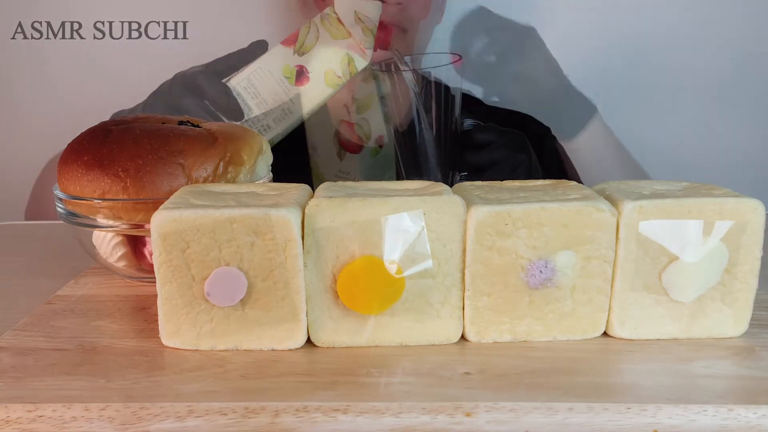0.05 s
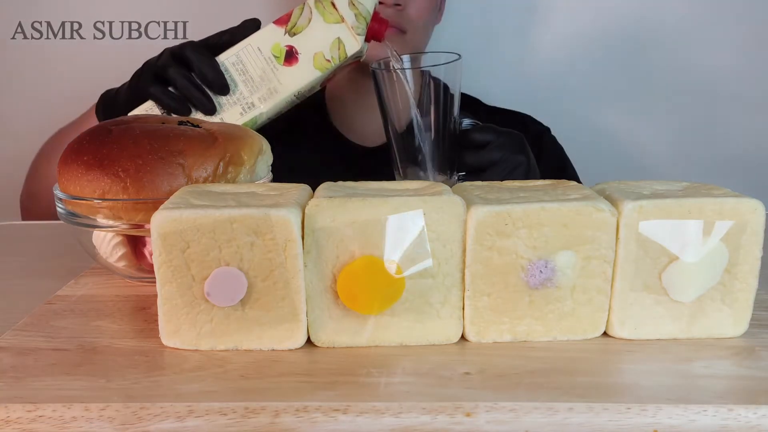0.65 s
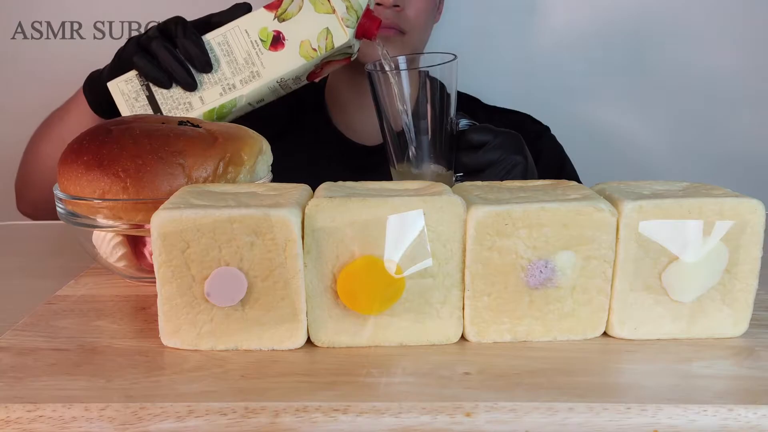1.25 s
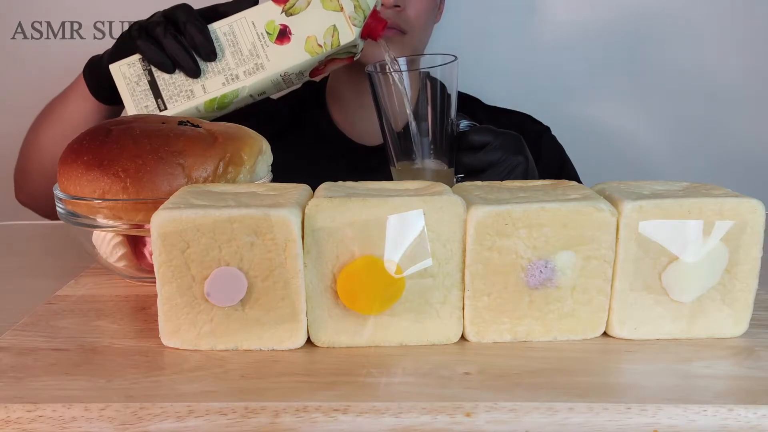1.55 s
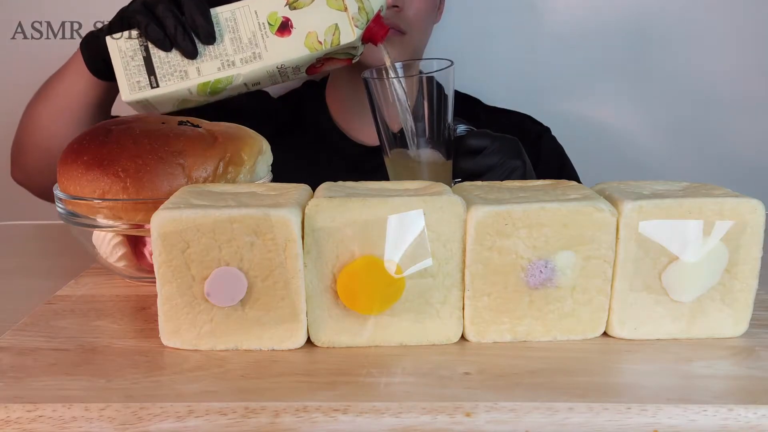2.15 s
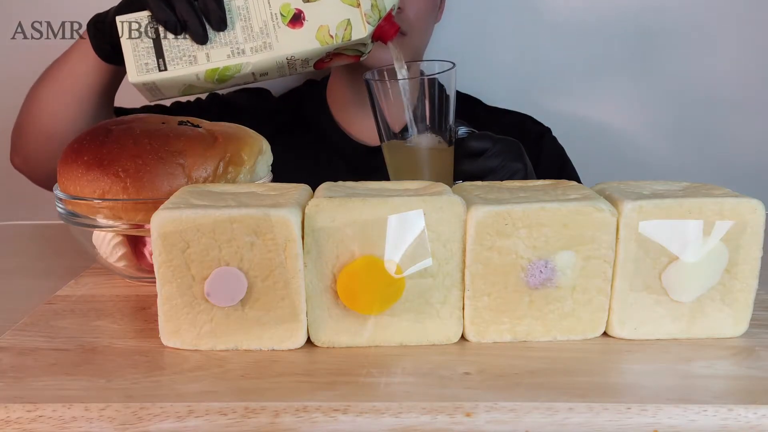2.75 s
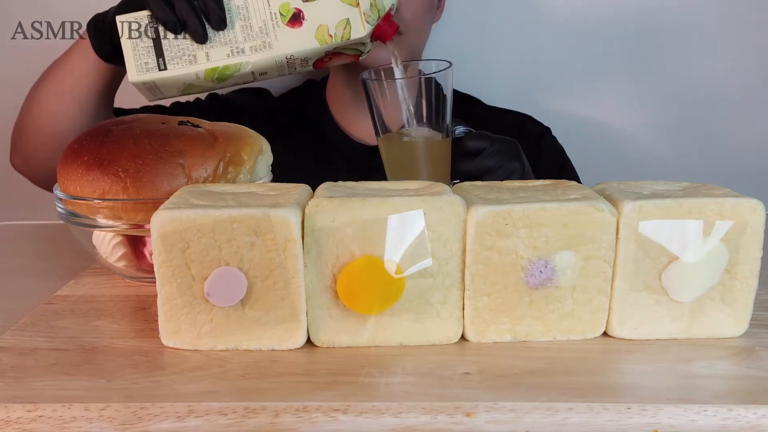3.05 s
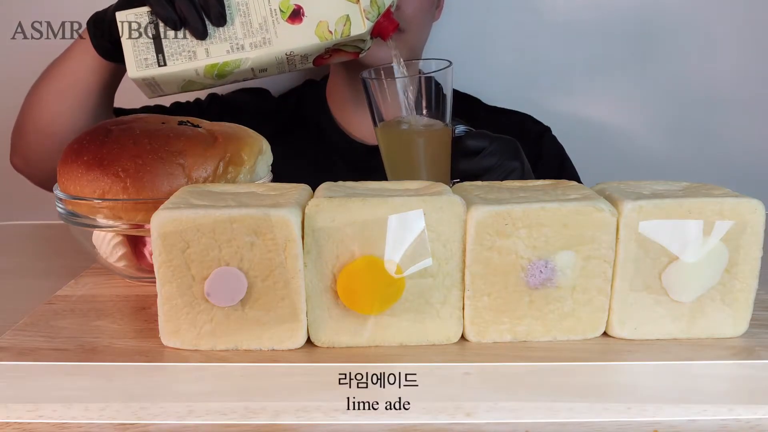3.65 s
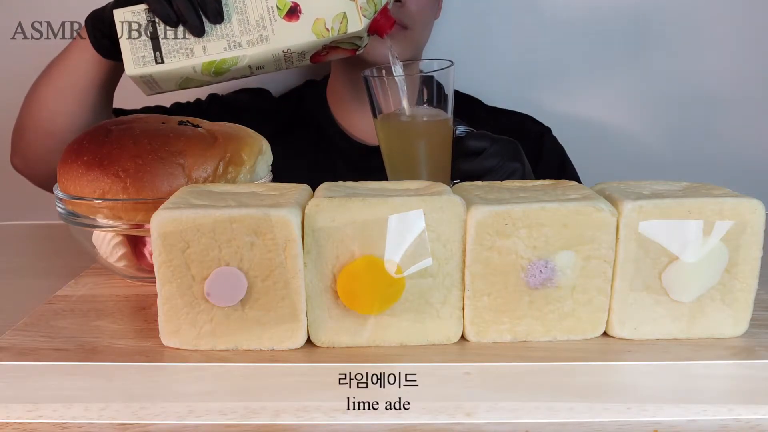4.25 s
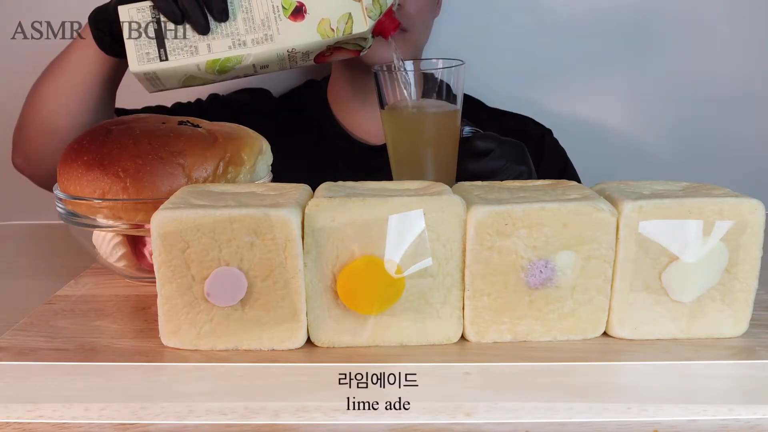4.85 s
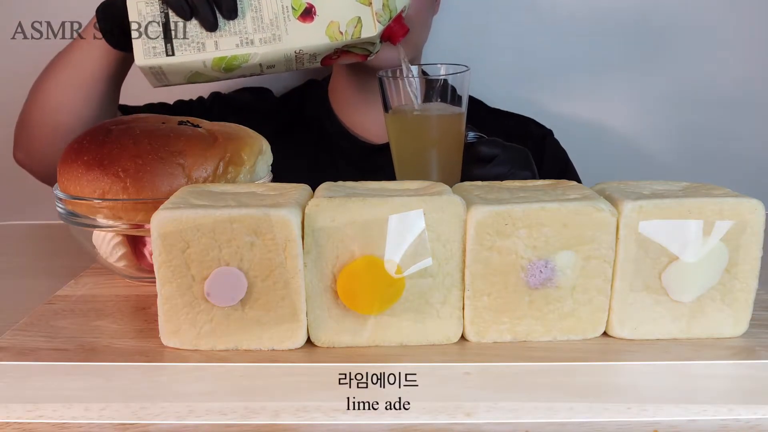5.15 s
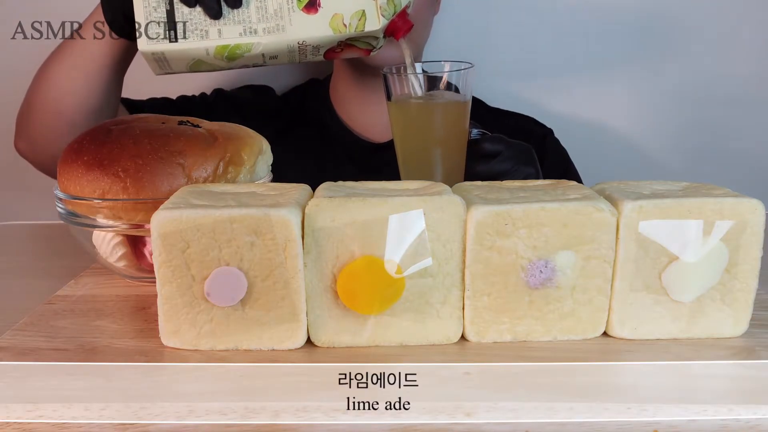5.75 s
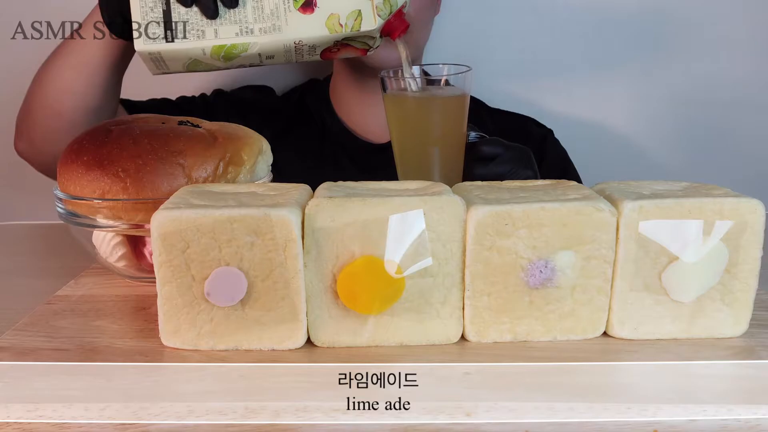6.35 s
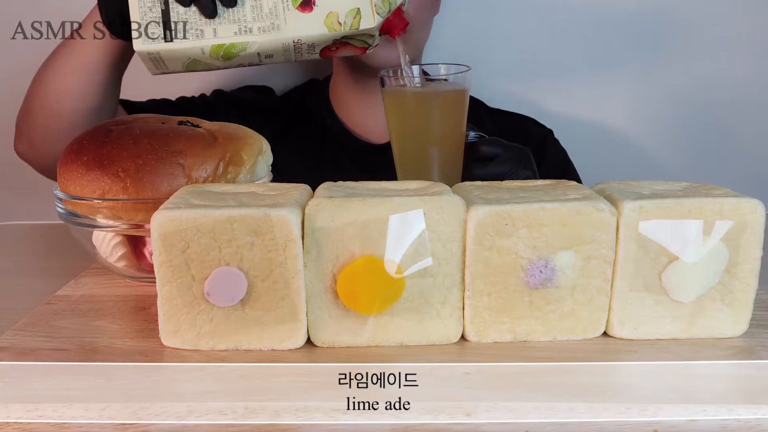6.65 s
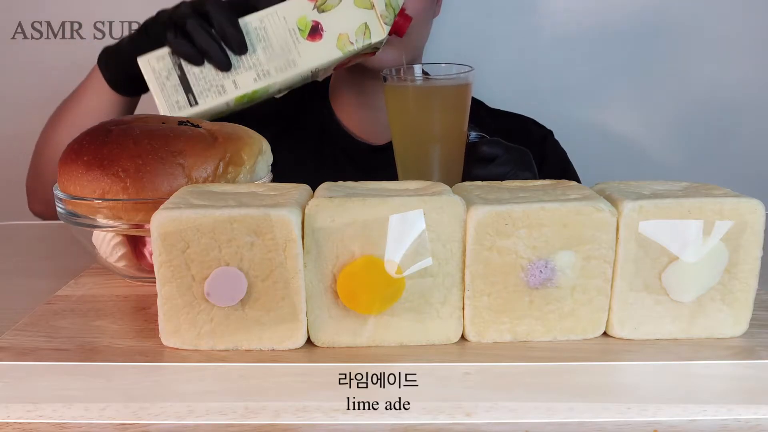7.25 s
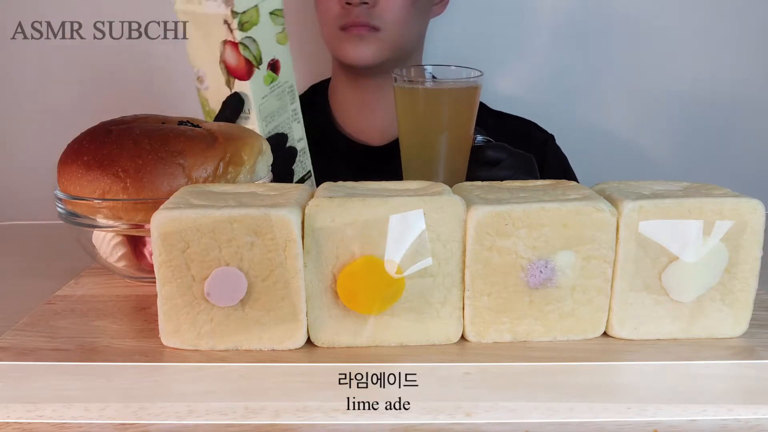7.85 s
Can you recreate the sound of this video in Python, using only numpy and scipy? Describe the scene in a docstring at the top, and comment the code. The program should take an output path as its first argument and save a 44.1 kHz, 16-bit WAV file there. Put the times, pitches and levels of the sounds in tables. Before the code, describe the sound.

A drink pours from a carton into a glass close by, with bright bubbly plinks, glugs and light fizz, thinning to drips.

```python
"""Glugs and bright plinks come first, close by and in stereo: a drink pours from a carton into a glass.
Each gush traps air, which rings as bubbles: large ones singly, over a swarm of small ones and spray.
The air column in the glass shortens as it fills, so its note rises; foam hisses and the carton gulps.
The stream thins to drips over a low rumble, and a limiter holds down the loudest plops."""
import sys
import numpy as np
from scipy import signal
from scipy.fft import rfft, irfft, next_fast_len
from scipy.io import wavfile
from scipy.ndimage import uniform_filter1d, minimum_filter1d, map_coordinates

SR = 44100
rng = np.random.default_rng(int(sys.argv[2]) if len(sys.argv) > 2 else 0)


def dump(signal):
    """Clip the signal to [-1, 1] and save it as 16-bit WAV at the path in sys.argv[1]."""
    limited = np.clip(np.atleast_2d(signal).T, -1, 1)
    pcm = np.round(limited * 32767).astype(np.int16)
    wavfile.write(sys.argv[1], SR, pcm)


N = 357210

# Levels are relative: each source applies its own gain.
# spectra of the background and of the stream: (frequency [Hz], level [dB])
RUMBLE_SPECTRUM = [(15, -58.5), (25, -17.5), (37, -29.5), (54, -7.5), (75, 2), (97, -4.5), (171, -6.5),
                   (406, -17.5), (584, -20.5), (700, -19.5), (910, -28.5), (1540, -120)]
HISS_SPECTRUM = [(180, -23), (300, -3), (418, -9), (486, -5.5), (667, -13), (713, -9), (946, -7.5),
                 (14500, -22.5), (16000, -56.5)]
GURGLE_SPECTRUM = [(200, 6.5), (600, -16.5), (780, 7), (1000, 7), (1600, 10), (2100, -4.5), (3500, -28.5)]
FIZZ_SPECTRUM = [(700, -16.5), (1400, -11), (2100, -1.5), (3400, -4.5), (5000, -6.5), (6800, -7),
                 (8500, -11.5), (14000, -50.5)]
SPRAY_SPECTRUM = [(2000, -10.5), (5000, -2), (7500, -9), (9500, -3), (11300, -0.5), (13500, 0),
                  (16000, -6.5)]
# spectra of carton bumps, foam and splashes: (frequency [Hz], level [dB])
BUMP_SPECTRUM = [(200, -15), (900, 10.5), (1600, -14.5), (3200, -4), (7000, -7), (15000, -26)]
TICK_SPECTRUM = [(2000, -3.5), (8000, -8), (11500, -7), (16000, 0.5)]
FOAM_SPECTRUM = [(800, -19.5), (2500, -9), (5000, -4), (8000, -5.5), (11500, -3), (16000, -10.5)]
SPLASH_SPECTRUM = [(200, -24), (900, -1), (2500, 7), (4500, -2.5), (6500, -11), (9000, -6), (15000, -16)]
# likeness of left and right: (frequency [Hz], correlation [1])
RUMBLE_COHERENCE = [(40, 0.09), (150, 0.14), (400, 0.3)]
HISS_COHERENCE = [(300, 0.12), (3000, 0.05)]
FOAM_COHERENCE = [(2000, 0.53), (12000, 0.41)]
# swells of rumble, probably the moving arm: (centre [s], half-width [s], level [dB])
RUMBLE_SWELLS = [(.28, 0.28, -37.5), (2.58, .05, -34), (2.75, 0.047, -40.5), (3.02, 0.037, -33),
                 (3.499, 0.93, -49), (3.95, 0.047, -41), (4.41, 0.032, -39.5), (5.013, 0.62, -36.5),
                 (5.39, 0.034, -29), (5.63, 0.058, -35.5), (6.14, 0.033, -40), (6.27, 0.092, -35.5),
                 (7.18, 0.13, -34), (7.52, 0.033, -31.5), (7.8, 0.94, -44.5)]
# reverberation time: (frequency [Hz], t60 [s])
ROOM_DECAY = [(300, 0.44), (1200, 0.42), (4000, 0.3), (12000, 0.2)]
# stereo balance of the drink: (frequency [Hz], right over left [dB])
BALANCE = [(60, 1.5), (500, 7.5), (1200, 4), (4000, 2.5), (8000, 1.5), (14000, 1.6)]
# the carton's hollow note: (time [s], frequency [Hz])
CARTON_NOTE = [(2.2, 613), (2.6, 448), (2.9, 406), (4.1, 467)]
# air entering the carton: (time [s], level [dB])
CARTON_GULPS = [(2.194, -38.5), (2.316, -31), (2.438, -25.5), (2.608, -24), (2.812, -29), (2.9, -42),
                (3.87, -45)]
# the carton set upright: (time [s], level [dB], frequency for stereo spread [Hz])
CARTON_BUMPS = [(7.52, -6, 657), (7.682, -16, 791)]
# the head of foam: (time [s], level [dB])
FOAM_LEVEL = [(0, -85), (2.5, -69), (4.1, -57.5), (4.4, -46.5), (4.9, -44), (5.5, -44), (5.9, -55.5),
              (7.3, -48.5), (7.7, -51.5), (8.1, -54)]
# hum of the glass wall: (time [s], level [dB])
WALL_LEVEL = [(4.1, -84), (4.4, -53), (4.6, -61), (4.75, -58), (5.25, -39), (5.5, -50), (5.85, -63),
              (6.95, -64), (7.13, -46), (7.35, -52.5), (7.6, -49.5), (7.8, -72)]
# low and high modes of the glass: (frequency [Hz], width [Hz], level [dB])
HUM_MODES = [(1520, 100, -2.5), (2656, 180, -9.5)]
SHIMMER_MODES = [(6775, 330, -6), (10980, 720, 0.5)]
# the air above the drink: (time [s], first resonance [Hz], second resonance [Hz])
AIR_COLUMN = [(0, 868, 2230), (.7, 811, 2290), (1.2, 883, 2330), (1.45, 994, 2380), (2.5, 1118, 2580),
              (3.1, 1276, 3080), (3.7, 1410, 3240), (4.4, 1523, 3480), (6.2, 1546, 3520), (7.3, 1826, 3760)]
# droplets hitting the wall: (time [s], level [dB])
DROPLET_HITS = [(.181, 4.5), (0.2018, 16), (.4304, 2), (0.5829, 12.5), (.626, 4.5), (1.003, -3.5),
                (0.7728, 6.5), (2.117, -4.5), (2.152, 2.5), (2.439, 7), (2.7946, 2.5), (2.8186, 4),
                (3.116, 8.5), (3.602, -6), (4.3831, -10), (5.109, -4.5), (5.422, -4), (5.5696, 4.5),
                (6.8803, -17.5), (7.145, -12), (7.5896, -18.5)]
# the unbroken stream: (time [s], level [dB])
STEADY_FLOW = [(0, -26), (.6, -34), (.68, -27.5), (.98, -46), (1.08, -80), (2.1, -76.5), (2.25, -35.5),
               (2.72, -38), (2.86, -27), (3.6, -35), (3.76, -43.5), (4.0, -37.5), (4.12, -55), (4.6, -43),
               (4.7, -30.5), (5.05, -31.5), (5.22, -44), (5.6, -31.5), (5.87, -60), (7.0, -55),
               (7.25, -36.5), (7.7, -91.5)]
# surges of the stream: (start [s], length [s], gurgle [dB], fizz [dB], spray [dB])
STREAM_GUSHES = [(0.048, 0.095, -19.5, -14.5, -18.5), (0.189, .025, -24, -33.5, -29),
                 (0.243, 0.13, -17.5, -11.5, -25.5), (0.407, 0.022, -28.5, -28, -31),
                 (0.49, 0.04, -21, -15.5, -37), (0.555, 0.065, -22, -20.5, -23.5),
                 (0.749, 0.094, -27, -16.5, -19), (0.941, 0.026, -34, -21, -46),
                 (1.006, .005, -32, -20, -20.5), (1.091, 0.004, -33.5, -36.5, -38),
                 (1.114, .008, -31, -19, -29), (1.153, 0.0045, -35.5, -17.5, -21),
                 (1.224, 0.0056, -40, -36, -30.5), (1.399, .02, -51, -46, -38.5),
                 (1.418, 0.061, -26.5, -24.5, -27), (1.561, 0.034, -25, -21.5, -25.5),
                 (1.65, 0.034, -30, -21, -29), (1.727, 0.0046, -48, -44, -28),
                 (1.948, 0.027, -22, -23, -24.5), (2.022, 0.0033, -37, -15, -30.5),
                 (2.153, 0.047, -21.5, -18, -32.5), (2.238, 0.03, -27.5, -27.5, -42),
                 (2.29, 0.023, -24, -20, -9), (2.383, 0.0052, -47.5, -20, -37.5),
                 (2.417, 0.015, -29.5, -14.5, -24.5), (2.56, 0.052, -13.5, -18.5, -24.5),
                 (2.653, 0.005, -34, -15.5, -29.5), (2.75, 0.081, -17, -20.5, -23.5),
                 (2.882, .025, -19, -20, -39.5), (2.94, .02, -20, -24, -67.5),
                 (3.095, 0.03, -17.5, -21.5, -19.5), (3.267, 0.054, -28, -23, -38),
                 (3.359, 0.041, -26.5, -26, -42), (3.465, 0.051, -31, -23.5, -34),
                 (3.537, 0.11, -26.5, -25.5, -36.5), (3.679, 0.0088, -29, -24.5, -29.5),
                 (3.789, .012, -24.5, -35, -38.5), (3.862, .012, -38, -26, -56.5),
                 (4.181, 0.081, -30, -29, -49), (4.378, 0.0046, -25.5, -23, -39.5),
                 (4.452, 0.038, -33, -23.5, -41.5), (4.98, 0.031, -27, -27, -42),
                 (5.064, 0.064, -26.5, -27, -39.5), (5.278, .035, -27.5, -28.5, -41.5),
                 (5.393, 0.054, -28.5, -28.5, -33), (5.56, .022, -25.5, -20.5, -26),
                 (5.634, 0.11, -28.5, -31.5, -52.5), (5.942, 0.02, -38.5, -27.5, -44),
                 (6.105, 0.043, -42, -31, -37.5), (6.172, 0.047, -38, -32.5, -43),
                 (6.514, 0.049, -59, -50, -44), (6.699, 0.017, -50, -36, -51), (6.93, .04, -48, -36, -77),
                 (7.229, 0.032, -49, -24, -23)]
# pitch of the fizz, which rises as the glass fills, dips during the drips and rises at the end:
# (time [s], typical frequency [Hz])
FIZZ_PITCH = [(0, 3240), (1.5, 3650), (3.5, 4147), (4.9, 3923), (5.6, 2736), (6.3, 2324), (7, 2740),
              (7.4, 3670)]
# a shorter fall lets bubbles ring longer; the softest onsets come at the very start: # (time [s], 60 dB decay
# [cycles], onset [cycles], splash level [dB])
PINCH_OFF = [(0, 53, 1.7, 2), (4.6, 47, .9, -1), (5.8, 78.5, 1.23, 2.5), (7.0, 76, 1.3, -9.5)]
# the loudest single bubbles: (time [s], frequency [Hz], level [dB])
LARGE_BUBBLES = [(.038, 6220, -3), (.047, 1380, -6.5), (.057, 5090, -3.5), (0.083, 1900, -9),
                 (.092, 2990, 0), (0.109, 5600, 3), (.124, 959, 4.5), (.123, 2090, -7.5), (0.128, 2645, 1),
                 (.203, 1730, -6.5), (0.202, 3160, -0.5), (0.242, 2160, -5), (.263, 1007, -5),
                 (.263, 1843, -5), (.264, 2270, -4), (.281, 3800, 8.5), (0.284, 2950, 2), (0.288, 978, -11),
                 (.307, 2105, -10.5), (.312, 3650, 6), (0.324, 4140, -2), (0.327, 3400, -3.5),
                 (0.329, 900, -6), (.336, 4300, 10.5), (.348, 817, -12.5), (0.353, 4420, -3),
                 (0.357, 2070, -5), (.36, 796, 8), (0.369, 2300, -3.5), (.404, 853, 0.5), (.415, 832, -5),
                 (.475, 4970, 6.5), (0.504, 2290, -6.5), (.516, 993, -3.5), (.516, 2085, -7.5),
                 (0.522, 900, -2), (.572, 801, -12), (.582, 11450, 2), (.631, 5590, -5), (.757, 3100, -9),
                 (.759, 913, -8.5), (0.76, 2250, -5.5), (.774, 890, -4.5), (0.817, 4900, -4),
                 (.84, 758, -19.5), (.841, 1840, -6), (0.846, 2310, -4), (.859, 6970, -2), (.932, 2530, -7),
                 (.932, 3420, -3), (0.932, 845, -16.5), (1.005, 2270, -12.5), (1.004, 5730, -7),
                 (1.003, 840, -15), (1.092, 2105, -6), (1.095, 982, -11.5), (1.155, 975, -10.5),
                 (1.156, 5800, 3), (1.179, 907, 7), (1.18, 1685, -12), (1.236, 3200, -18),
                 (1.418, 7520, -3), (1.427, 4580, -7.5), (1.428, 1219, -5), (1.44, 2990, -2.5),
                 (1.464, 8120, 5.5), (1.465, 1067, -11.5), (1.471, 2255, -11.5), (1.496, 3670, -8),
                 (1.533, 3840, -10), (1.564, 2600, -15.5), (1.593, 973, -10), (1.641, 2280, -13),
                 (1.653, 2100, -9), (1.668, 1520, -15), (1.669, 780, -17.5), (1.727, 12320, -10),
                 (1.729, 6580, -4), (1.947, 3100, -6.5), (1.965, 1570, -9.5), (1.967, 2340, -12),
                 (1.967, 1014, -7), (2.029, 1033, -8.5), (2.164, 1534, -6), (2.166, 930, -13.5),
                 (2.186, 2700, -6), (2.198, 828, -13.5), (2.199, 1290, -5.5), (2.253, 6820, -2.5),
                 (2.295, 2710, -4), (2.311, 1103, 3), (2.325, 3400, -1.5), (2.423, 1490, -1.5),
                 (2.424, 1150, 8.5), (2.443, 1078, 2), (2.452, 1010, -13), (2.519, 3520, 1),
                 (2.558, 1390, -10), (2.561, 985, -8.5), (2.591, 3660, -1), (2.6, 1045, -4.5),
                 (2.604, 842, -13), (2.766, 3220, -3), (2.78, 3060, -3), (2.796, 1014, -7.5),
                 (2.818, 11600, 8), (2.884, 11550, 5), (2.903, 1190, -15.5), (2.945, 3440, -6.5),
                 (2.947, 5430, -8), (3.013, 3060, -11), (3.073, 7520, -9.5), (3.097, 1223, -14),
                 (3.095, 4080, -3.5), (3.12, 11630, -1), (3.121, 1346, -8), (3.14, 4350, -9),
                 (3.222, 5120, -2), (3.229, 1715, -10), (3.23, 4960, -4), (3.277, 3500, -9.5),
                 (3.296, 1550, -14.5), (3.463, 1506, -14), (3.464, 4220, -9), (3.477, 5800, -3),
                 (3.493, 11400, -5), (3.494, 4900, -4), (3.511, 5490, -9), (3.547, 4500, -6.5),
                 (3.557, 3210, -13), (3.569, 2220, -14.5), (3.603, 10300, -4.5), (3.608, 1410, -11.5),
                 (3.683, 1780, -13.5), (3.807, 1475, -18.5), (3.807, 2070, -12.5), (3.871, 4200, -8),
                 (3.882, 6600, -5.5), (3.95, 2620, -17.5), (4.005, 4020, -15.5), (4.214, 3610, -9),
                 (4.226, 3380, -12), (4.254, 2380, -10.5), (4.382, 13600, -4.5), (4.384, 2720, -10),
                 (4.459, 3800, -12), (4.484, 5500, -5), (4.557, 5720, -12.5), (4.668, 2980, -16),
                 (4.749, 3750, -13), (4.766, 2590, -17), (4.802, 3720, -12.5), (4.819, 5100, -12.5),
                 (4.851, 2520, -13.5), (4.911, 3720, -16.5), (4.921, 3730, -11.5), (4.944, 5640, -7.5),
                 (4.986, 1700, -14.5), (4.999, 6400, -6.5), (5.081, 3670, -11), (5.121, 3010, -15),
                 (5.301, 3300, -19), (5.394, 2000, -15), (5.406, 3440, -8), (5.425, 12530, -4),
                 (5.469, 5750, -5), (5.469, 3290, -14), (5.471, 2000, -8.5), (5.542, 2720, -4),
                 (5.561, 2430, -6.5), (5.571, 1810, -10.5), (5.571, 1374, -13.5), (5.633, 1680, -18.5),
                 (5.657, 1810, -16.5), (5.685, 3560, -15.5), (5.704, 2250, -12.5), (5.741, 1950, -18),
                 (5.756, 2430, -20), (5.836, 2120, -29), (5.942, 2414, -13), (5.988, 2405, -23.5),
                 (6.103, 2990, -6), (6.112, 7080, -13), (6.112, 2375, -1.5), (6.118, 2020, -11.5),
                 (6.133, 1390, -12), (6.134, 3080, -15), (6.133, 1805, -19), (6.18, 1250, -20.5),
                 (6.188, 2600, -17.5), (6.208, 2070, -12), (6.267, 1960, -28), (6.319, 2110, -31),
                 (6.392, 1450, -30), (6.394, 2020, -27.5), (6.444, 2660, -12.5), (6.444, 3870, -29),
                 (6.524, 3100, -17.5), (6.527, 2286, -12.5), (6.559, 2180, -24.5), (6.639, 2720, -22.5),
                 (6.64, 6720, -23.5), (6.723, 2130, -14), (6.722, 3300, -16.5), (6.777, 2560, -14),
                 (6.777, 7080, -16.5), (6.778, 1590, -34), (6.914, 2067, -15), (6.912, 4810, -16),
                 (6.941, 1800, -16.5), (6.941, 2240, -16), (6.941, 3550, -10.5), (6.968, 3590, -4.5),
                 (6.977, 4950, -22), (6.997, 2900, -17), (7.143, 3620, -11.5), (7.232, 3250, -4.5),
                 (7.235, 5600, -15), (7.238, 2655, -4), (7.249, 4450, -8.5), (7.252, 2540, -3),
                 (7.306, 4670, -3.5)]


def amp(db):
    """Decibels to amplitude ratio."""
    return 10 ** (np.asarray(db) / 20)


def unit(x):
    """Normalisation to rms 1."""
    return x / np.sqrt(np.mean(x ** 2) + 1e-20)


def along(points, hz):
    """Interpolation on a logarithmic frequency axis."""
    f, v = np.transpose(points)
    return np.interp(np.log(hz + 1), np.log(f + 1), v)


def curves(rows):
    """Linear interpolation in time: one value per sample for each later column."""
    s, *cols = np.transpose(rows)
    return [np.interp(np.arange(N) / SR, s, c) for c in cols]


def filtered(x, response):
    """Filtering as multiplication of the spectrum by a frequency response."""
    m = next_fast_len(N + SR // 4)
    return irfft(rfft(x, m) * response(np.fft.rfftfreq(m, 1 / SR)), m)[..., :N]


def coloured(x, spectrum, size=1024):
    """A minimum-phase filter of unit energy: causal, so attacks stay sharp."""
    cepstrum = irfft(np.log(amp(along(spectrum, np.fft.rfftfreq(size, 1 / SR)))))
    kernel = irfft(np.exp(rfft(2 * cepstrum[:size // 2], size)))
    return signal.oaconvolve(x, kernel[None] / np.linalg.norm(kernel), axes=1)[:, :N]


def noise(spectrum, coherence):
    """Partly coherent stereo noise: the ratio of mid to side sets the correlation."""
    def response(hz):
        angle = np.arccos(along(coherence, hz)) / 2
        return amp(along(spectrum, hz)) * [np.cos(angle), np.sin(angle)]
    mid, side = filtered(rng.standard_normal((2, N)), response)
    return unit(np.array([mid + side, mid - side]))


def bursts(count, t60, size):
    """Impacts as exponentially decaying noise, one per row."""
    t = np.arange(size) / SR
    return rng.standard_normal((count, size)) * amp(-60 * t / t60)


def placed(times, waves, hz, spread_db=8.5):
    """Directivity: rows are summed into stereo, short wavelengths leaving the glass more unevenly."""
    index = (times * SR).astype(int)[:, None] + np.arange(waves.shape[1])
    lean = amp(spread_db * (hz / 10000) ** 1.5 * rng.standard_normal(len(times)))
    gains = np.array([lean, 1 / lean]) / np.sqrt((lean ** 2 + lean ** -2) / 2)
    return np.array([np.bincount(index.ravel(), (waves * g[:, None]).ravel(), N)[:N] for g in gains])


def even(x, window_s=0.037):
    """Division by the running rms steadies the level but keeps single grains."""
    power = np.abs(uniform_filter1d(np.mean(x ** 2, 0), int(window_s * SR)))
    return x / np.sqrt(power + power.mean() / 1000)


def resonance(x, hz, width_hz):
    """A driven resonator with gain 1 at its moving centre."""
    carrier = np.exp(2j * np.pi * np.cumsum(hz) / SR)
    pole = np.exp(-np.pi * width_hz / SR)
    return 2 * (carrier * signal.lfilter([1 - pole], [1, -pole], x / carrier)).real


def plinks(hz, t60, rise, onset_cycles, size):
    """Damped oscillators, one per row; a positive rise is the glide of a bubble nearing the surface."""
    t = np.arange(size) / SR
    hz, t60, rise = hz[:, None], t60[:, None], rise[:, None]
    pitch = hz * (1 + rise * (np.minimum(t / t60, 1) - 1 / 7))
    envelope = amp(-60 * t / t60) * (1 - np.exp(-t * hz / onset_cycles))
    return envelope * np.sin(2 * np.pi * np.cumsum(pitch, 1) / SR)


def background(still_db=-50.5, hiss_db=-51, lean_db=1.5, lumps_db=3, lumps_per_s=16):
    """Incoherent powers add: lumpy swells ride on a low rumble, stronger on the right, with hiss."""
    now = np.arange(N) / SR
    swell_power = sum(amp(db) ** 2 * np.exp(-((now - s) / half) ** 2) for s, half, db in RUMBLE_SWELLS)
    lumps = amp(lumps_db * map_coordinates(rng.standard_normal(400), [now * lumps_per_s], mode="mirror"))
    envelope = np.sqrt(amp(still_db) ** 2 + swell_power * lumps ** 2)
    rumble = envelope * noise(RUMBLE_SPECTRUM, RUMBLE_COHERENCE) * amp([[-lean_db], [lean_db]])
    return rumble + amp(hiss_db) * noise(HISS_SPECTRUM, HISS_COHERENCE)


def room(x, wet_db=-21):
    """Reverberation: a small furnished room absorbs each frequency at its own rate."""
    hz, t, spectra = signal.stft(rng.standard_normal((2, SR // 2)), SR, nperseg=256)
    tail = signal.istft(spectra * amp(-60 * t / along(ROOM_DECAY, hz)[:, None]), SR, nperseg=256)[1]
    tail = np.pad(tail / np.linalg.norm(tail[0]), ((0, 0), (SR // 250, 0)))  # 4 ms late
    return amp(wet_db) * signal.oaconvolve(x.mean(0)[None], tail, axes=1)[:, :N]


def table_top(x, echo_db=-14, t60=0.05, apart=0.9):
    """Early reflections: the table and the things on it scatter sound, partly alike in both channels."""
    t = np.arange(SR // 25) / SR
    scatter = rng.standard_normal(len(t)) + apart * rng.standard_normal((2, len(t)))
    scatter *= amp(-60 * t / t60) * (t > .0007)
    return amp(echo_db) * signal.oaconvolve(x, scatter / np.linalg.norm(scatter[0]), axes=1)[:, :N]


def carton_air(level_db=-3, rise_s=.012, fall_s=0.03, draw_s=(2.6, 3.77), draw_db=-52, draw_fade_s=.1):
    """Cavity resonance: gulps and a steady draw of air sound the emptying carton's sinking note."""
    now = np.arange(N) / SR
    gulps = sum(amp(db) * np.exp(-np.maximum((s - now) / rise_s, (now - s) / fall_s))
                for s, db in CARTON_GULPS)
    draw = amp(draw_db) * np.exp(-np.abs(now - np.clip(now, *draw_s)) / draw_fade_s)
    note_hz, = curves(CARTON_NOTE)
    hollow = resonance(rng.standard_normal(N), note_hz, width_hz=84)
    hollow = unit(resonance(hollow, note_hz, width_hz=53))
    return amp(level_db) * (gulps + draw) * hollow


def carton_bumps(level_db=-11, attack_s=0.0076):
    """Soft, heavily damped impacts as the carton is set upright."""
    s, db, hz = np.transpose(CARTON_BUMPS)
    t = np.arange(SR // 6) / SR
    bumps = bursts(len(s), t60=0.041, size=len(t)) * (1 - np.exp(-t / attack_s))
    return coloured(placed(s, amp(db + level_db)[:, None] * bumps, hz), BUMP_SPECTRUM)


def foam(ticks_db=-6, hiss_db=-3):
    """Film rupture: single cells tick as they burst, over the soft hiss of the foam."""
    level_db, = curves(FOAM_LEVEL)
    cells = swarm(per_s=28, centre_hz=np.full(N, 11500), spread=0.084,
                  cycles=7, size_db=4.5, rise=0, size=120)
    ticks = unit(coloured(cells, TICK_SPECTRUM))
    hiss = noise(FOAM_SPECTRUM, FOAM_COHERENCE)
    return amp(level_db + ticks_db) * ticks + amp(level_db + hiss_db) * hiss


def wall_hum():
    """Forced vibration: the smooth stream keeps the modes of the glass wall faintly ringing."""
    def modes(f):
        return sum(amp(db) / (1 + 1j * (f - hz) / width) ** 2 for hz, width, db in HUM_MODES)
    level_db, = curves(WALL_LEVEL)
    return amp(level_db) * unit(filtered(rng.standard_normal(N), modes))


def wall_pings(mode_hz=6850, t60=0.0092, level_db=-26.5, scatter_db=4, detune=0.027):
    """Impulse excitation: the jolt of each large bubble strikes a high, short note from the glass."""
    s, _, db = np.transpose(LARGE_BUBBLES)
    strength, offset = rng.standard_normal((len(s), 2)).T
    hz = mode_hz * np.exp(detune * offset)
    rings = plinks(hz, np.full(len(s), t60), np.zeros(len(s)), onset_cycles=2.2, size=1200)
    return placed(s, amp(db + level_db + scatter_db * strength)[:, None] * rings, hz)


def droplets(level_db=-7):
    """Brief impacts are broadband: flying droplets snap against the wall."""
    s, db = np.transpose(DROPLET_HITS)
    snaps = amp(db + level_db)[:, None] * bursts(len(s), t60=0.0033, size=400)
    return coloured(placed(s, snaps, np.full(len(s), 9000)), SPRAY_SPECTRUM)


def afterglow(rings, level_db=-7, width_hz=9):
    """Sympathetic resonance: a bubble near the note of the air column leaves it singing."""
    column_hz, _ = curves(AIR_COLUMN)
    return amp(level_db) * resonance(rings, column_hz, width_hz)


def glass(splash, first_db=6):
    """Pipe resonance: the shrinking air column sings with the splash; fixed wall modes add shimmer."""
    first_hz, second_hz = curves(AIR_COLUMN)
    first = amp(first_db) * resonance(splash, first_hz, width_hz=23)
    second = resonance(splash, second_hz, width_hz=60)
    shimmer = sum(amp(db) * resonance(splash, np.full(N, hz), width) for hz, width, db in SHIMMER_MODES)
    return splash + first + second + shimmer


def radiated(x, cutoff_ratio):
    """Radiation efficiency: the narrow glass emits little below the rising note of its air column."""
    column_hz, _ = curves(AIR_COLUMN)
    notes = np.linspace(column_hz.min(), column_hz.max(), 5)
    sound = 0
    for hz, share in zip(notes, np.eye(len(notes))):  # crossfade between fixed filters
        highpass = signal.butter(4, cutoff_ratio * hz, "highpass", fs=SR, output="sos")
        sound += np.interp(column_hz, notes, share) * signal.sosfilt(highpass, x)
    return sound


def swarm(per_s, centre_hz, spread, cycles, size_db, rise, size):
    """Superposition of random bubbles around a pitch curve: many faint, a few strong."""
    count = int(per_s * N / SR)
    detune, life, climb = rng.standard_normal((count, 3)).T
    times = rng.random(count) * (N - 1) / SR
    hz = np.clip(centre_hz[(times * SR).astype(int)] * np.exp(spread * detune), 300, 15000)
    t60 = cycles / hz * np.exp(.5 * np.clip(life, -2, 1.5))
    gain = amp(size_db * rng.exponential(size=count))
    rings = plinks(hz, t60, rise * (1 + climb), onset_cycles=0.19, size=size)
    return placed(times, gain[:, None] * rings, hz)


def splatter(per_s=460, size_db=11.5, decay_s=0.002):
    """A Poisson process: independent hits each release a sharp burst of wet noise."""
    hits = (rng.random(N) < per_s / SR) * amp(size_db * np.minimum(rng.exponential(size=N), 4))
    envelope = signal.lfilter([1], [1, -np.exp(-1 / (decay_s * SR))], hits)
    return envelope * (rng.standard_normal(N) + 0.74 * rng.standard_normal((2, N)))


def pouring(mix_db=(-9.5, 2, -12), attack_s=0.0026, fade_db_per_s=527,
            settle_db=-18.5, settle_db_per_s=188):
    """Steady flow and gushes add in power, giving the gains of gurgle, fizz and spray."""
    flow_db, = curves(STEADY_FLOW)
    power = amp(np.add.outer(mix_db, flow_db)) ** 2
    for start, length, *levels in STREAM_GUSHES:
        span = np.arange(int((start - attack_s) * SR), min(int((start + length + .5) * SR), N))
        t = span / SR - start
        after = np.maximum(t - length, 0)
        attack = np.clip(1 + t / attack_s, 0, 1)
        # the gush dies quickly, the stirred surface settles more slowly
        release = amp(np.maximum(-fade_db_per_s * after, settle_db - settle_db_per_s * after))
        power[:, span] += np.outer(amp(levels), attack * release) ** 2
    return np.sqrt(power)


def stream(gurgle_db=-3, fizz_db=-3, spray_db=-2, splatter_db=-2):
    """Air entrainment: the pour stirs up deep bubbles, small ones in wet splatter, and spray."""
    gurgle_gain, fizz_gain, spray_gain = pouring()
    column_hz, _ = curves(AIR_COLUMN)
    fizz_hz, = curves(FIZZ_PITCH)
    gurgle = swarm(per_s=190, centre_hz=column_hz * 1.15, spread=.24,
                   cycles=60, size_db=7.5, rise=0.017, size=2400)
    fizz = swarm(per_s=1200, centre_hz=fizz_hz, spread=0.3686,
                 cycles=47, size_db=4.5, rise=0.033, size=1200)
    fizz = unit(fizz) + amp(splatter_db) * unit(splatter())
    spray = swarm(per_s=330, centre_hz=np.full(N, 9800), spread=0.35,
                  cycles=24, size_db=8.5, rise=.05, size=300)
    return (gurgle_gain * amp(gurgle_db) * even(coloured(gurgle, GURGLE_SPECTRUM))
            + fizz_gain * amp(fizz_db) * even(coloured(fizz, FIZZ_SPECTRUM))
            + spray_gain * amp(spray_db) * even(coloured(spray, SPRAY_SPECTRUM)))


def large_bubbles(level_db=3.5, snap_db=-14, rise=0.01, shed_db=-13, shed_spread=.3, shed_delay_s=.004):
    """Trapped air is a spring, the liquid its mass: each bubble splashes, sheds three more and rings."""
    s, hz, db = np.transpose(LARGE_BUBBLES)
    cycles, onset, splash_db = (c[(s * SR).astype(int)] for c in curves(PINCH_OFF))
    t60 = cycles / hz
    glide = rise * (1 + rng.standard_normal(len(s)))
    rings = plinks(hz, t60, glide, onset_cycles=onset[:, None], size=7000)
    snaps = amp(db + snap_db + splash_db)[:, None] * bursts(len(s), t60=0.0054, size=1000)
    splashes = coloured(placed(s, snaps, hz), SPLASH_SPECTRUM)
    for _ in range(3):
        detune, delay, strength = rng.standard_normal((len(s), 3)).T
        shed_hz = np.clip(hz * np.exp(shed_spread * detune), 700, 15000)
        shed = plinks(shed_hz, np.minimum(t60, .025), rise * strength, onset_cycles=1, size=1200)
        shed *= amp(db + shed_db + 0.53 * strength)[:, None]
        splashes += placed(s + shed_delay_s * np.abs(delay), shed, shed_hz)
    return placed(s, amp(db + level_db)[:, None] * rings, hz), splashes


def scene():
    """Superposition of all sources and reflections; a level difference sets the glass to the right."""
    rings, splashes = large_bubbles()
    plops = radiated(rings, cutoff_ratio=0.7) + afterglow(rings) + wall_pings()
    pour = radiated(glass(stream() + splashes), cutoff_ratio=0.76)
    drink = plops + pour + droplets() + foam() + wall_hum() + carton_air() + carton_bumps()
    direct = filtered(drink, lambda hz: amp(np.outer([-.5, .5], along(BALANCE, hz))))
    return direct + table_top(direct) + room(drink) + background()


def record(dry, window=90, top_hz=16000):
    """Peak limiting holds the loudest plops at full scale; a low-pass then limits the band."""
    needed = 1 / np.maximum(np.abs(dry), 1)
    gain = uniform_filter1d(minimum_filter1d(needed, window, axis=1), window, axis=1)
    return filtered(dry * gain, lambda hz: hz < top_hz)


dry = scene()
out = record(dry)
dump(out)
```